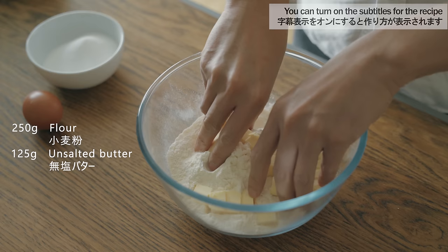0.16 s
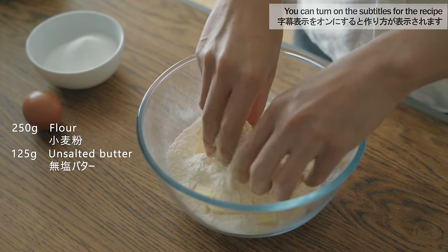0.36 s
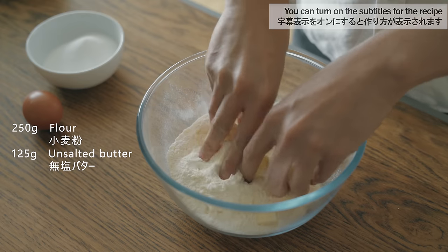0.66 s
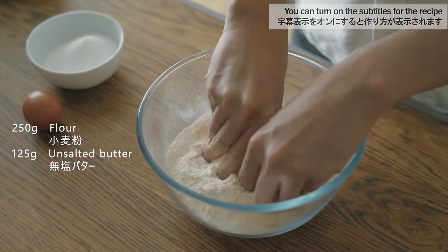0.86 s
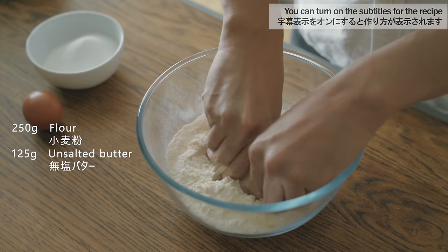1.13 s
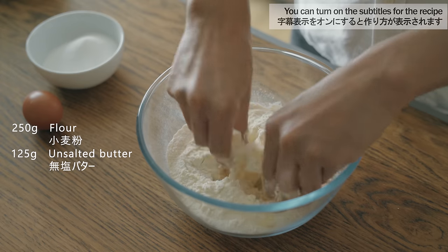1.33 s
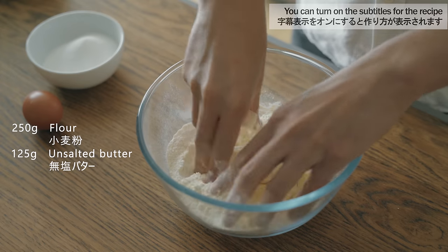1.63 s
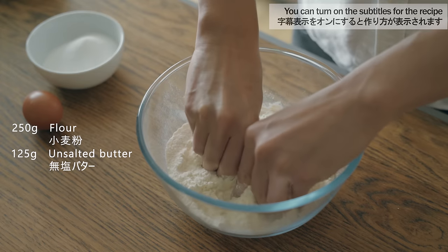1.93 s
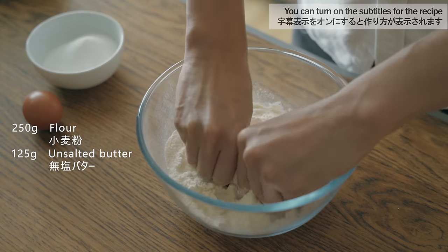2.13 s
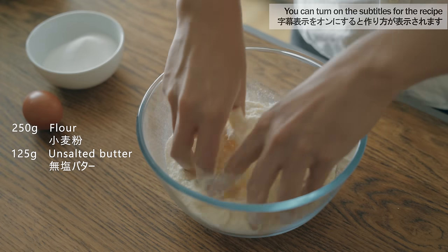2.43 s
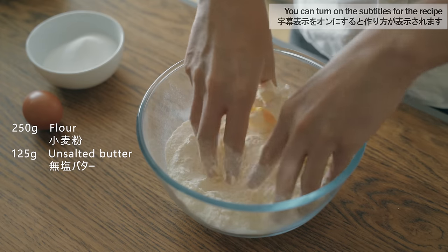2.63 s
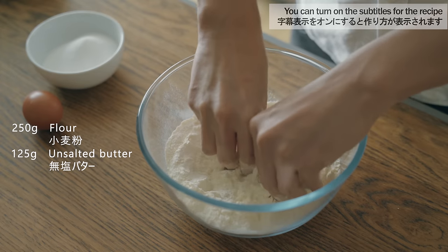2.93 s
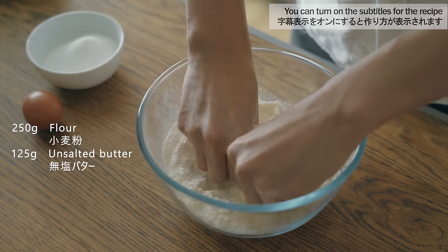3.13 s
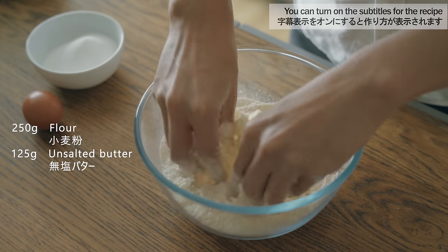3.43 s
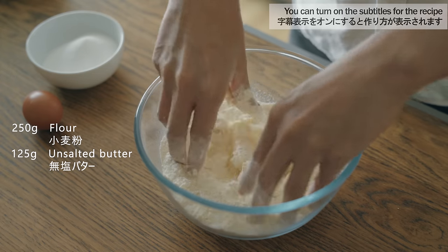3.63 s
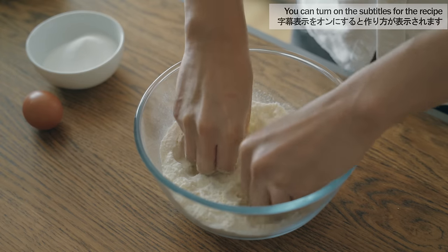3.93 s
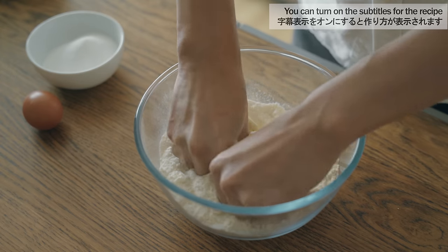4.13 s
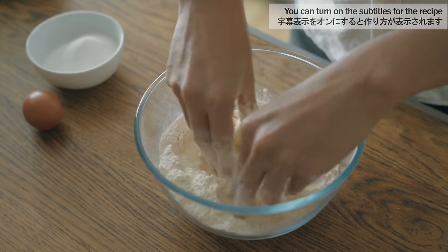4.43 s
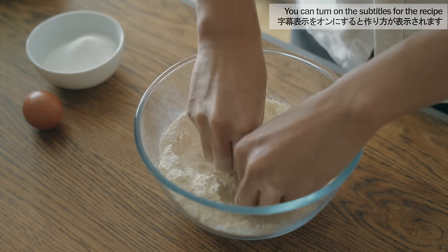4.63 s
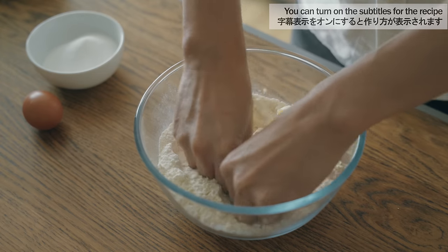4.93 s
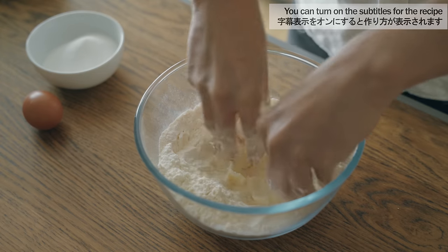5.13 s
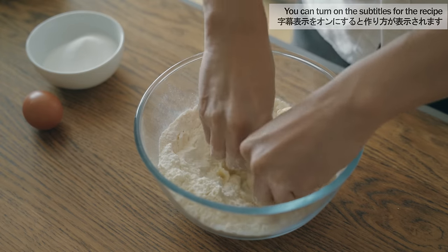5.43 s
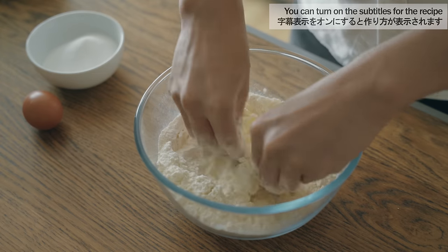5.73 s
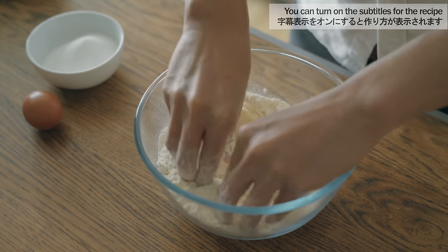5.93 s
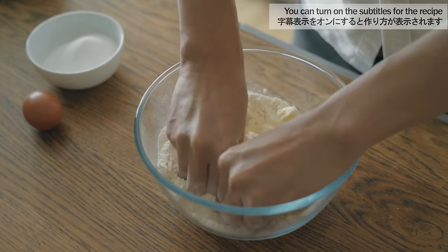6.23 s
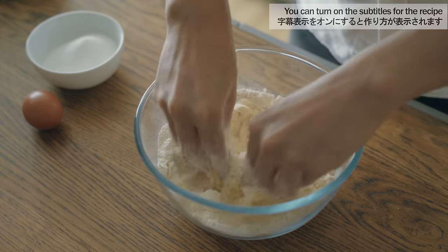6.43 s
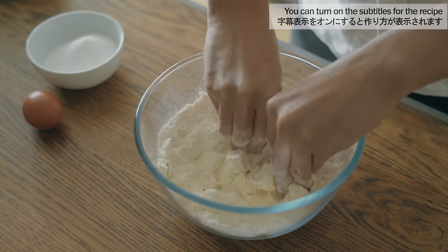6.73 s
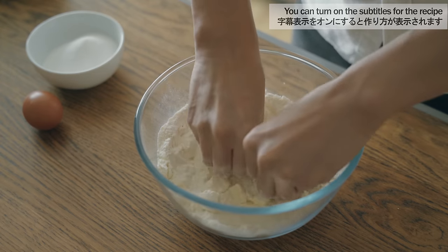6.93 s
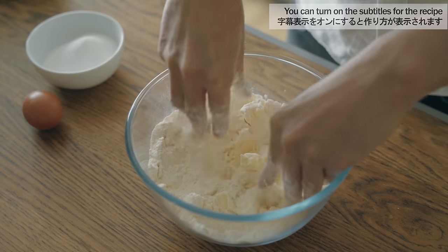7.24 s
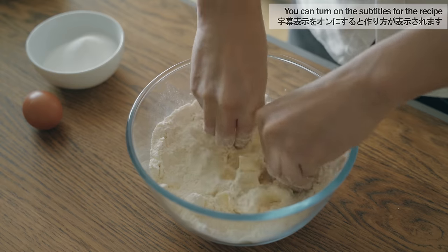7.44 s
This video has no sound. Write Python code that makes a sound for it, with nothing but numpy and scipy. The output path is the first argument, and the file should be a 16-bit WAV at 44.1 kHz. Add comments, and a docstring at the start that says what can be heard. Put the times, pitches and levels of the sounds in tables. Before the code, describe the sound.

Fingers rub cold butter into flour in a glass bowl, soft crunches and powdery hisses growing busier, with dull knocks on a wooden table.

```python
"""Rubbing butter into flour

Two hands rub cold butter into flour in a glass bowl on a wooden table, heard close by in a quiet kitchen.
Flour is dense random grains that crunch, rasp and hiss; butter lumps snap and excite the hollow of the bowl.
Fingers scrape and tick the glass, which rings in damped modes; skin whispers against skin.
The bowl also rocks and knocks on the table; filtered noise and decaying noise echoes form the kitchen."""
import sys
import numpy as np
from scipy import signal
from scipy.fft import rfft, irfft
from scipy.io import wavfile
from scipy.ndimage import map_coordinates

SR = 44100
rng = np.random.default_rng(int(sys.argv[2]) if len(sys.argv) > 2 else 0)


def generate_wav(sig):
    """Save sig (samples, or channels by samples) to the path in sys.argv[1] as 16-bit PCM at SR."""
    pcm = np.round(np.clip(np.atleast_2d(sig).T, -1, 1) * 32767).astype(np.int16)
    wavfile.write(sys.argv[1], SR, pcm)


N = 333837
TIME = np.arange(N) / SR  # seconds


def undb(db):
    """Decibels express amplitude ratios: 20 dB is a factor of ten."""
    return 10 ** (np.asarray(db) / 20)


def unit(x):
    """Root-mean-square normalisation: the mean power becomes 1."""
    return x / np.sqrt(np.mean(x ** 2))


def add(track, s, sound, peak_db):
    """Superposition: a sound scaled to its peak level is summed into the track at s seconds."""
    start = int(s * SR)
    part = sound[:max(N - start, 0)]
    track[start:start + len(part)] += part * undb(peak_db) / np.abs(sound).max()


def colour(x, spectrum):
    """Linear filtering: gains interpolated over log frequency shape the spectrum; rms 1."""
    hz, db = np.transpose(spectrum)
    bins = np.maximum(np.fft.rfftfreq(2 * N, 1 / SR), 1)
    gain = undb(np.interp(np.log(bins), np.log(hz), db))
    return unit(irfft(rfft(x, 2 * N) * gain)[:N])


def ring(modes):
    """Modal superposition: one impulse starts a decaying cosine in each damped mode."""
    t = TIME[:SR // 2]
    response = np.zeros(len(t))
    for hz, db, t60 in modes:
        decay = np.exp(-np.log(1000) * t / t60)
        response += undb(db) * decay * np.cos(2 * np.pi * hz * t)
    return response


def soften(x, hz):
    """Contact compliance: a yielding contact spreads the push in time and takes the treble away."""
    return signal.sosfilt(signal.butter(2, hz, fs=SR, output="sos"), x)


def walk(rate):
    """Random modulation: lines join normal random values drawn rate times a second; rms 1."""
    knots = rng.standard_normal(N // 10)
    return unit(np.interp(TIME * rate, np.arange(len(knots)), knots))


def grains(rate, spread_db):
    """Shot noise of tiny slips: positive spread makes a few stand out, negative makes a few fainter."""
    happens = rng.random(N) < rate / SR
    size_db = spread_db * np.minimum(rng.exponential(size=N), 5)
    return unit(happens * undb(size_db) * rng.standard_normal(N))


def shift_colour(x, depth_db, rate, width_hz):
    """Time-varying filtering: moving fingers reshape the gaps, so neighbouring bands swell and fade."""
    hz, s, cells = signal.stft(x, SR, nperseg=1024)
    # bands are width_hz wide in the bass and widen towards the treble
    band = np.log1p(hz / 1500) * 1500 / width_hz
    field = rng.standard_normal((256, 512))
    places = np.meshgrid(band, s * rate, indexing="ij")
    wander = map_coordinates(field, places, order=1, mode="wrap")
    return unit(signal.istft(cells * undb(depth_db * wander), SR)[1][:N])


def effort():
    """Addition of powers: squeezes build, hold and let go; slips swell and fade on top; gives gains."""
    # Flour that keeps settling between squeezes: levels of crunch, rasp and hiss in dB.
    resting_db = (-76.5, -80.5, -79)
    # The hands close and knead. Each row: start in seconds, length in seconds,
    # crunch of packed flour in dB, rasp of crumbs in dB, hiss of powder in dB.
    squeeze_rows = [(0.0, 0.34, -77, -84, -97), (0.704, 0.78, -74, -73.5, -79),
                    (1.708, 0.97, -69.5, -72.5, -75), (2.693, 0.33, -73.5, -75, -84),
                    (2.895, 0.74, -68.5, -74, -78), (3.724, 0.58, -66, -66, -69.5),
                    (4.548, 0.47, -64, -66.5, -71), (5.013, 0.23, -71, -65, -72),
                    (5.24, 0.46, -67.5, -68, -78), (5.704, 0.2, -62, -64, -72),
                    (5.998, 0.594, -64.5, -68.5, -73), (6.659, 0.69, -64.5, -66.5, -71.5),
                    (7.365, 0.26, -60, -66.5, -70)]
    # Quick slips of the fingers through the heap. Each row: fastest moment in seconds,
    # length in seconds, crunch in dB, rasp in dB, hiss in dB.
    slip_rows = [(.46, 0.24, -96, -75, -72), (0.756, 0.17, -71, -66.5, -73),
                 (1.318, 0.12, -68.5, -69, -65.5), (1.37, 0.081, -68.5, -67.5, -76),
                 (1.482, .14, -83, -66, -59.5), (1.646, .07, -84, -69, -65), (1.738, 0.055, -81, -72, -60),
                 (1.811, 0.092, -60.5, -62.5, -60), (1.896, 0.084, -67, -70, -57.5),
                 (1.96, 0.29, -65.5, -67, -70), (2.332, 0.47, -69.5, -78, -63),
                 (2.452, 0.1, -57.5, -69, -65), (2.499, 0.081, -63, -63, -59), (2.57, 0.089, -81, -86, -63),
                 (2.733, .12, -82, -69, -57), (2.81, 0.19, -89, -63, -62), (2.897, 0.16, -64, -60, -64.5),
                 (3.163, 0.19, -62, -65, -61.5), (3.297, 0.24, -69, -65.5, -64),
                 (3.452, 0.21, -61.5, -61.5, -62), (3.507, 0.082, -76, -57, -65),
                 (3.566, 0.048, -67.5, -68, -55.5), (3.686, 0.04, -57.5, -68, -62),
                 (3.83, 0.14, -82, -72, -59.5), (3.875, 0.092, -64, -58, -69), (4.04, .15, -63, -60.5, -69),
                 (4.197, 0.098, -62, -71, -69), (4.338, .1, -61.5, -66, -65),
                 (4.392, 0.15, -54.5, -58, -61), (4.631, 0.042, -78, -76, -60.5),
                 (4.77, 0.16, -65, -61, -65), (4.916, 0.056, -69, -75, -62),
                 (5.061, 0.12, -56, -58.5, -55.5), (5.121, 0.033, -77, -60.5, -65),
                 (5.268, 0.052, -62, -62.5, -63), (5.34, 0.29, -63.5, -83, -68),
                 (5.627, 0.26, -61, -65.5, -69.5), (5.743, 0.042, -61, -71, -59),
                 (5.78, 0.086, -55, -55.5, -66), (5.817, 0.093, -75, -58, -62), (5.98, 0.19, -69, -69, -82),
                 (6.097, 0.14, -66, -66.5, -64.5), (6.368, 0.18, -62, -66, -72),
                 (6.486, 0.14, -55.5, -62.5, -66), (6.537, 0.078, -58, -62.5, -76),
                 (6.639, 0.056, -65, -59.5, -66), (6.71, 0.16, -73, -63, -58.5),
                 (6.774, 0.12, -59, -71, -68), (7.03, 0.24, -69, -64.5, -79), (7.2, 0.12, -47, -50, -60),
                 (7.42, 0.13, -80, -61.5, -60.5), (7.477, 0.084, -77, -64, -62)]
    loosened_s, attack_s, release_s = 1.7, 0.064, 0.07
    rise_share = 0.55  # part of a slip spent gathering speed

    power = np.outer(undb(resting_db), np.minimum(TIME / loosened_s, 1)) ** 2
    for s, length, *db in squeeze_rows:
        closing = (TIME - s) / attack_s
        opening = (s + length - TIME) / release_s
        grip = np.clip(np.minimum(closing, opening), 0, 1)
        power += np.outer(undb(db), grip) ** 2
    for s, length, *db in slip_rows:
        start = s - rise_share * length
        moving = slice(*np.searchsorted(TIME, [start, start + length]))
        progress = np.interp(TIME[moving], [start, s, start + length], [0, 1, 0])
        speed = np.sin(np.pi / 2 * progress)
        power[:, moving] += np.outer(undb(db), speed ** 1.43) ** 2
    return np.sqrt(power)


def flour(crunch_gain, rasp_gain, powder_gain):
    """Stick-slip granular friction: packed flour crunches, crumbs rasp, and denser powder grains hiss."""
    # Spectra of packed flour, crumbs and loose powder. Each row: frequency in Hz, level in dB.
    crunch_spectrum = [(150, -8), (330, -5), (530, -5), (740, 7), (900, -1), (1150, 1), (1700, -4.5),
                       (3000, -5), (4500, -13.5), (8000, -49)]
    rasp_spectrum = [(1500, -5), (3200, -2.5), (4400, -2), (5600, -3), (7600, -4), (9000, -8.5),
                     (14000, -11)]
    powder_spectrum = [(4000, -15), (7500, -4.5), (9500, -3), (12000, -1.5), (15500, -4)]
    slip = walk(rate=41)  # the grip catches and lets go

    crunch = colour(grains(rate=2200, spread_db=0.4), crunch_spectrum)
    crunch = shift_colour(crunch, depth_db=4.0, rate=22, width_hz=126.8)
    rasp = colour(grains(rate=5000, spread_db=-1.36), rasp_spectrum)
    rasp = shift_colour(rasp, depth_db=3.5, rate=25, width_hz=50)
    powder = colour(grains(rate=12000, spread_db=1.6), powder_spectrum)
    powder = shift_colour(powder, depth_db=2.9, rate=22, width_hz=24)
    return (crunch * crunch_gain * undb(0.7 * slip)
            + rasp * rasp_gain * undb(1.18 * slip)
            + powder * powder_gain * undb(0.99 * slip))


def pops(snap=7.6):
    """Impulsive fracture: a lump snaps and crumbles, exciting the air resonances of the hollow."""
    # Butter lumps giving way. Each row: time in seconds, peak level in dB, sharpness (low-pass) in Hz.
    pop_rows = [(1.7934, -30.5, 1250), (2.1434, -47.5, 700), (2.147, -49, 700), (2.447, -40, 1000),
                (2.483, -45, 2500), (2.49, -38, 4000), (2.496, -39, 1500), (2.6005, -34.5, 1800),
                (3.2824, -37.5, 1350), (3.661, -44, 700), (3.6793, -36, 1960), (3.863, -41, 1090),
                (5.251, -42.5, 2200), (5.779, -38.5, 1200), (5.785, -30.5, 1200), (5.9305, -45, 1110),
                (6.7777, -44.5, 695), (7.542, -28, 4000)]
    # Air between hands and bowl. Each row: frequency in Hz, level in dB, 60 dB decay time in seconds.
    hollow_modes = [(350, 1.5, 0.012), (710, 1.5, 0.022), (1140, -5.5, 0.017), (2680, -4, 0.0074),
                    (3180, -5, 0.02)]
    out, t = np.zeros(N), TIME[:SR // 20]
    hollow = ring(hollow_modes)
    hollow[0] += snap  # the direct sound
    crumbling = .035 * np.exp(-t / .004)
    all_crumbs = rng.standard_normal((len(pop_rows), len(t)))
    for (s, db, sharp_hz), crumbs in zip(pop_rows, all_crumbs):
        push = (t == 0) + crumbs * crumbling
        add(out, s, soften(signal.fftconvolve(push, hollow), sharp_hz), db)
    return out


def glass_ring(centre_hz, octaves):
    """Selective modal excitation: modes near the contact's pitch ring strongest; higher ones die sooner."""
    # Ring of the glass. Each row: frequency in Hz, level in dB before the weighting by contact pitch.
    glass_modes = [(1122, -3.5), (3166, -2.5), (4522, -1.5), (6083, -5.5), (7730, -19), (7845, 5.5),
                   (7930, -12), (8196, 3.5), (9010, -1), (9838, -2), (10232, -5), (11962, -2), (13722, -2),
                   (14352, -7)]
    t60_at_5khz_s = .115  # flour and fingers damp the glass
    modes = []
    for hz, db in glass_modes:
        distance = np.log2(hz / centre_hz) / octaves
        modes.append((hz, db - 6 * distance ** 2, t60_at_5khz_s * 5000 / hz))
    return ring(modes)


def scrapes():
    """Friction-driven resonance: flour dragged under the fingers makes the glass ring in glints."""
    # Fingers sliding on the glass. Each row: start in seconds, length in seconds,
    # rms level in dB before the swell and fade, centre of the friction in Hz.
    scrape_rows = [(1.0, 0.34, -73.5, 4400), (1.65, 0.19, -72, 2400), (1.661, 0.21, -59, 8800),
                   (1.707, .22, -64.5, 1100), (2.692, 0.16, -56.5, 9000), (3.752, 0.2, -60, 8000),
                   (3.98, .088, -64, 6000), (4.32, .1, -67, 8000), (4.372, .075, -53.5, 3800),
                   (5.323, .66, -73, 8000), (5.926, 0.17, -65, 8800), (6.26, .13, -62.5, 7560),
                   (6.654, .07, -54, 6000), (7.38, 0.12, -55.5, 4400), (7.45, .099, -63, 8500)]
    out = np.zeros(N)
    friction = shift_colour(grains(rate=3000, spread_db=-1.5), depth_db=4.5, rate=25, width_hz=121.5)
    for s, length, db, centre_hz in scrape_rows:
        drag = friction[int(s * SR):int((s + length) * SR)]
        # the fingers bite early and let go slowly
        grip = np.sqrt(np.hanning(len(drag)) * np.linspace(1, 0, len(drag)))
        ringing = signal.fftconvolve(drag, glass_ring(centre_hz, octaves=0.69))[:len(drag)]
        sound = unit(ringing) * grip
        add(out, s, sound, db + 20 * np.log10(np.abs(sound).max()))
    return out


def ticks(scratch=0.45, scratch_s=0.0026):
    """Impact excitation: a nail meets the glass with a click, a brief scratch and the modal ring."""
    # Fingernails touching the glass. Each row: time in seconds, peak level in dB.
    tick_rows = [(1.7184, -40), (3.752, -43), (6.6718, -29)]
    out, response = np.zeros(N), glass_ring(centre_hz=5200, octaves=0.58)
    response = response / np.abs(response).max()
    t = TIME[:len(response)]
    all_grit = rng.standard_normal((len(tick_rows), len(t)))
    for (s, db), grit in zip(tick_rows, all_grit):
        contact = 2 * (t == 0) + scratch * grit * np.exp(-t / scratch_s)
        # so small a contact gives off few lows
        add(out, s, response + contact - soften(contact, 1200), db)
    return out


def strokes(table):
    """Amplitude envelope: each finger stroke swells and fades as half a sine."""
    gain = np.zeros(N)
    for s, length, db in table:
        gain += undb(db) * np.sin(np.pi * np.clip((TIME - s) / length, 0, 1))
    return gain


def skin():
    """Resonant friction noise: dry fingers brush each other with a thin whisper."""
    # Skin brushing past skin. Each row: start in seconds, length in seconds, level at the height in dB.
    brush_rows = [(.41, 0.095, -64.5), (.59, 0.035, -63), (.72, 0.17, -72), (.96, 0.12, -70.5),
                  (2.52, 0.031, -56)]
    # Brushed skin. Each row: frequency in Hz, level in dB, 60 dB decay time in seconds.
    skin_modes = [(4400, 6.5, 0.0063), (6620, 15, 0.004), (7800, 6, 0.0012), (13900, 14, 0.0022)]
    whisper = signal.fftconvolve(grains(rate=8200, spread_db=0.3), ring(skin_modes))[:N]
    return unit(whisper) * strokes(brush_rows)


def knocks(deep_hz=115):
    """Impact excitation: the bowl lands on the table; depth of the thud weights their deepest modes."""
    # The bowl rocking on the table. Each row: time in seconds, peak level in dB, hardness of contact
    # (low-pass) in Hz, depth of the thud in dB (the lowest modes change by up to twice this).
    knock_rows = [(.815, -60.5, 200, 11), (1.528, -53.5, 120, 9), (1.623, -44.5, 160, -26),
                  (1.6299, -41.5, 200, -22), (1.6436, -45, 180, -7), (1.8, -40.5, 200, -6),
                  (1.913, -50, 200, -6), (2.427, -45.5, 220, 8), (2.499, -42, 400, -6),
                  (2.603, -45, 350, 11.5), (2.62, -43.5, 198, -5), (3.408, -56.5, 198, 8),
                  (3.635, -49.5, 250, -4), (3.68, -28.5, 480, -11), (3.693, -31.5, 172, 2),
                  (3.742, -44, 250, -8), (3.863, -48.5, 300, 1), (4.045, -46.5, 183, -13),
                  (4.353, -52.5, 170, 11), (4.398, -34.5, 330, -18), (4.422, -30.5, 241, -10),
                  (4.485, -46, 200, -7), (4.968, -41.5, 395, 0), (5.202, -51.5, 249, 1),
                  (5.269, -43.5, 140, 3), (5.302, -53, 132, 10), (5.794, -41.5, 110, 1),
                  (5.941, -43.5, 130, 8), (6.083, -52, 220, -10), (6.125, -53, 220, -14),
                  (6.302, -54, 170, 9), (6.399, -42.5, 160, 9), (6.485, -40.5, 400, 3),
                  (6.636, -40, 160, 9), (6.68, -41.5, 120, 0.5), (6.779, -55, 150, 13),
                  (7.11, -46.5, 130, 4), (7.137, -42.5, 141, -23), (7.19, -39.5, 252, -19),
                  (7.32, -48, 170, 3), (7.5358, -13, 600, 2.5), (7.541, -40, 200, -6),
                  (7.552, -30, 200, -7)]
    # Bowl and table together. Each row: frequency in Hz, level in dB, 60 dB decay time in seconds.
    table_modes = [(85.6, -10.5, 0.32), (129.7, -1, 0.14), (149, -1, 0.21), (195.4, 4, 0.1), (243, 0, 0.11),
                   (342.3, 1.5, 0.067), (385, -3.5, 0.27), (442, 0.5, 0.12), (483, 7.5, 0.024),
                   (607, 3, 0.072), (840, -9.5, 0.19), (1200, -9, 0.14), (1750, -2, 0.056)]
    out = np.zeros(N)
    detunes = rng.standard_normal((len(knock_rows), len(table_modes)))
    for (s, db, hard_hz, depth_db), detune in zip(knock_rows, detunes):
        modes = []
        for (hz, mode_db, t60), d in zip(table_modes, detune):
            thud_db = 2 * depth_db / (1 + (hz / deep_hz) ** 4)
            # the hands load the bowl a little differently each time
            modes.append((hz * (1 + 0.02 * d), mode_db + thud_db, t60))
        add(out, s, soften(ring(modes), hard_hz), db)
    return out


def pressing(crunch_gain):
    """Structure-borne sound: kneading shakes bowl and table, and the rumble grows with the crunch."""
    # Rumble of bowl and table. Each row: frequency in Hz, level in dB.
    rumble_spectrum = [(25, -13), (50, 2), (82, 6), (150, -2), (220, 1.5), (320, -10.5), (500, -9.5),
                       (1200, -28)]
    level_db, follows = -74, 0.64  # level at the median crunch; dB of rumble per dB of crunch
    rumble = colour(grains(rate=640, spread_db=-1.5), rumble_spectrum)
    rumble = shift_colour(rumble, depth_db=2.0, rate=30, width_hz=160)
    force = (crunch_gain / np.median(crunch_gain)) ** follows
    return rumble * force * undb(level_db)


def reflections(x, t60_s):
    """Diffuse reverberation: exponentially decaying noise of unit energy stands for dense echoes."""
    t = TIME[:SR // 2]
    response = rng.standard_normal(len(t)) * np.exp(-np.log(1000) * t / t60_s)
    return signal.fftconvolve(x, response / np.linalg.norm(response))[:N]


def kitchen():
    """Stationary filtered noise: the quiet kitchen is a steady hush."""
    # Hush of the kitchen. Each row: frequency in Hz, level in dB.
    kitchen_spectrum = [(25, -16), (60, -15), (130, -7.5), (190, -4), (235, 1), (330, -7), (700, -11),
                        (1000, -13.5), (2400, -15), (7500, -17.5), (10000, -19), (15500, -29)]
    return colour(rng.standard_normal(N), kitchen_spectrum) * undb(-70)


def scene():
    """Superposition of sources: all sounds at the bowl, then hush, faint echo and a little width."""
    room_t60_s, room_db, spread_db = 0.32, -18, -23.5
    crunch_gain, rasp_gain, powder_gain = effort()
    rubbing = flour(crunch_gain, rasp_gain, powder_gain)
    # some of the rubbing reaches the glass through the heap of flour
    response = glass_ring(centre_hz=7000, octaves=2.22)
    response = response / np.linalg.norm(response)
    through_glass = signal.fftconvolve(rubbing, response)[:N] * undb(-20.0)
    bowl = rubbing + through_glass + pops() + scrapes() + ticks() + skin() + knocks() + pressing(crunch_gain)

    mid = bowl + kitchen() + undb(room_db) * reflections(bowl, room_t60_s)
    # long waves reach both sides alike
    short_waves = signal.sosfilt(signal.butter(1, 500, "high", fs=SR, output="sos"), mid)
    side = undb(spread_db) * reflections(short_waves, t60_s=0.055)
    return np.array([mid + side, mid - side])


def record(dry):
    """Band limiting and stereo balance: the lows lean right; deep bass and top are cut off."""
    right_db, balance_hz = 1.24, 1800  # right over left in the deep range; corner of the leaning range
    low_cut_hz, top_hz = 44, 15600
    lows = signal.sosfilt(signal.butter(1, balance_hz, fs=SR, output="sos"), dry)
    side_gains = undb(np.array([[-right_db], [right_db]]) / 2)
    tilted = dry + lows * (side_gains - 1)
    lean = signal.sosfilt(signal.butter(2, low_cut_hz, "high", fs=SR, output="sos"), tilted)
    return signal.sosfilt(signal.ellip(12, .1, 80, top_hz, fs=SR, output="sos"), lean)


dry = scene()
out = record(dry)
generate_wav(out)
```